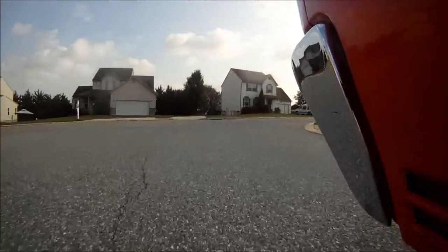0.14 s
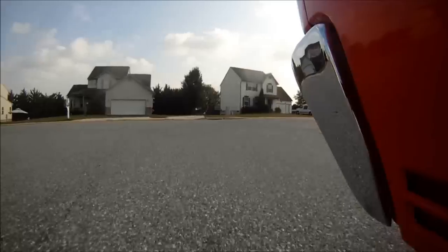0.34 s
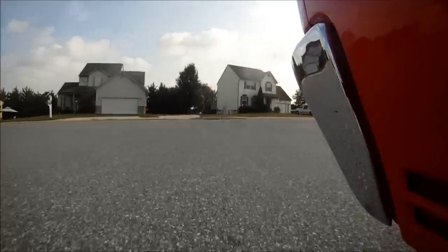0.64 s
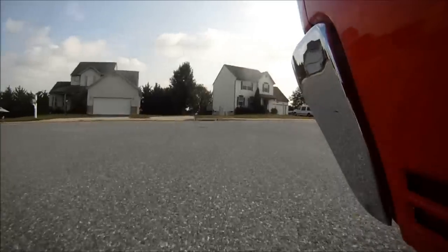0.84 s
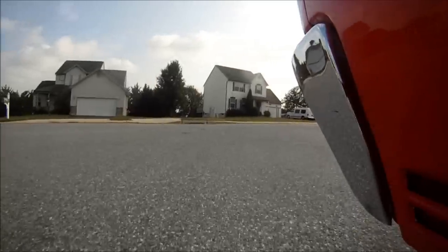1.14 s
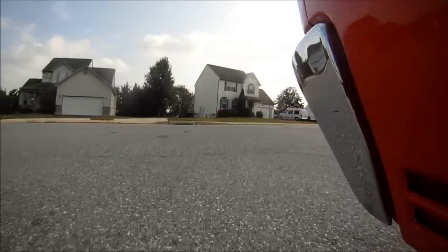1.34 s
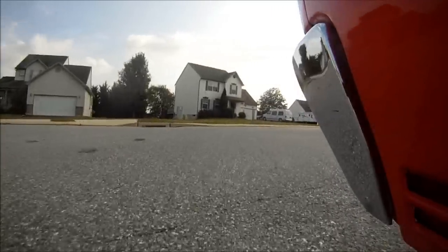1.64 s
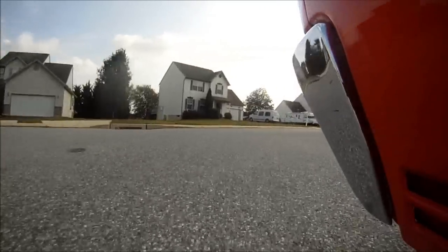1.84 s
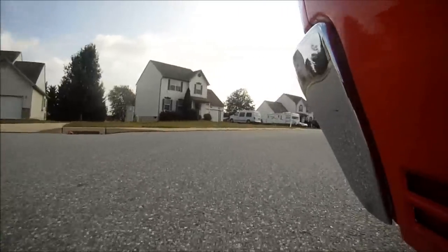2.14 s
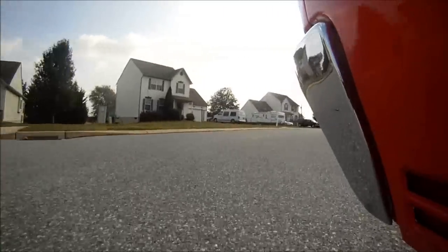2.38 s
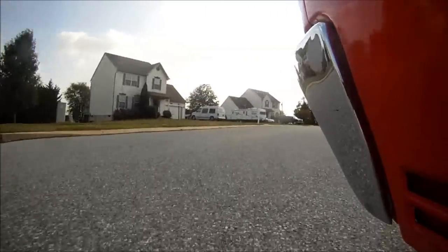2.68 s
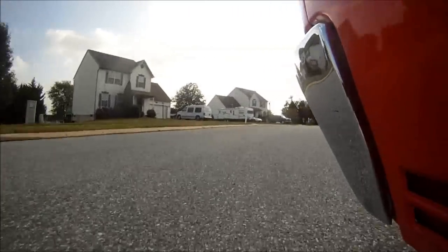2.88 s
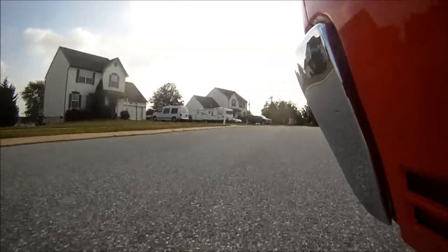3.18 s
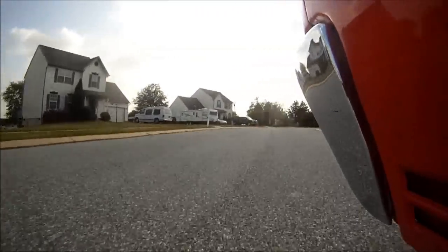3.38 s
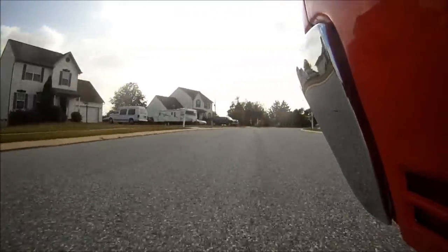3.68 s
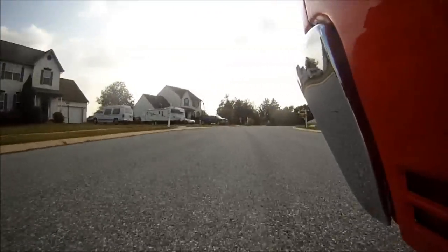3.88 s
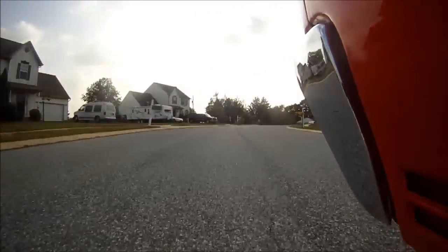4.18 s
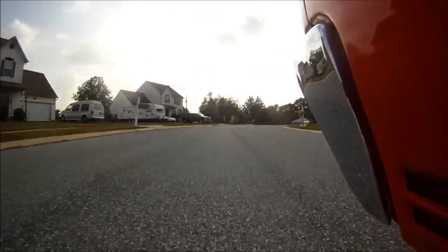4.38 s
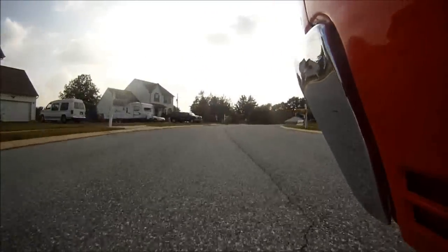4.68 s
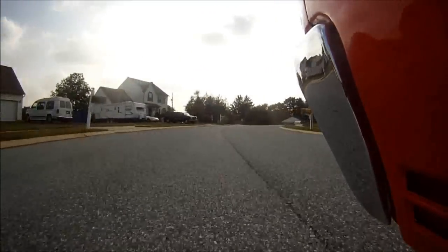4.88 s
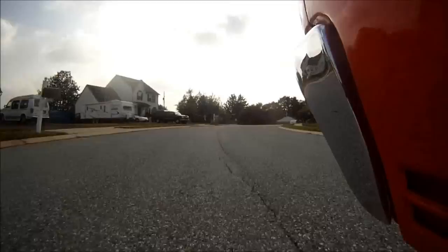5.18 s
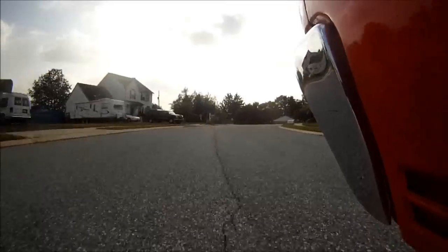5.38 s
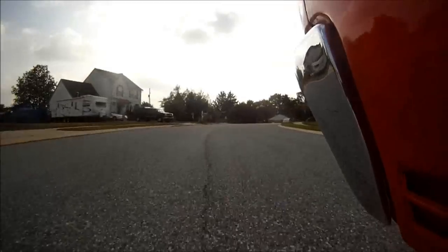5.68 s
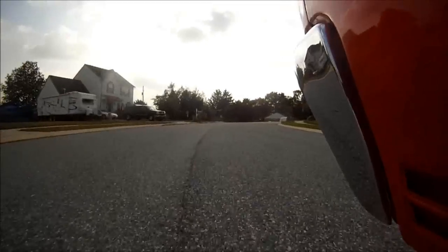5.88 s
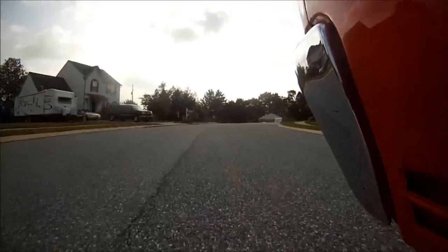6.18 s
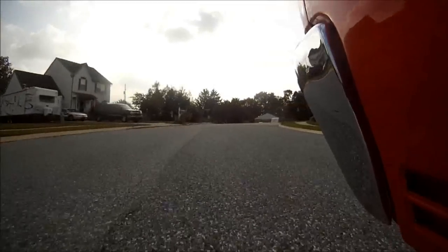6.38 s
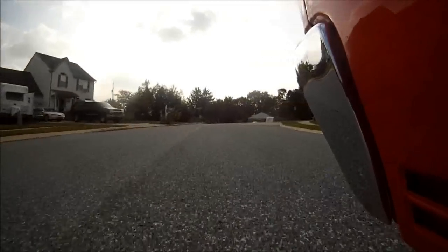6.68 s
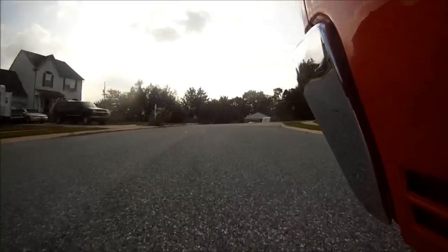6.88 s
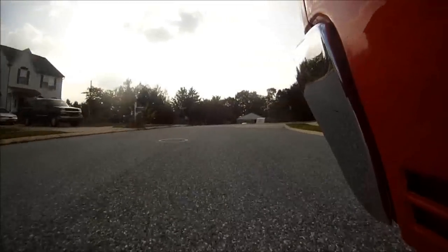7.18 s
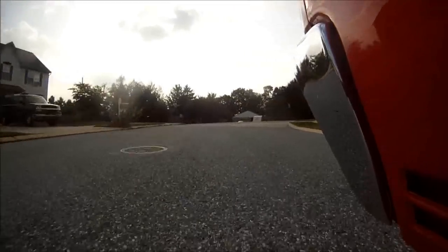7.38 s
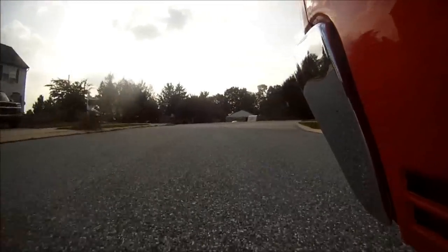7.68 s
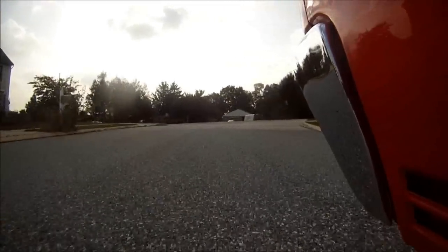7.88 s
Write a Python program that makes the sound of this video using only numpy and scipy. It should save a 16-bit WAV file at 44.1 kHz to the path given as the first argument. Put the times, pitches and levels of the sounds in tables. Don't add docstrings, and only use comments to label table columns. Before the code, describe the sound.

Close exhaust burble of a big V8, uneven and bassy, quickens into a throaty rasping drone with turbo whistle, then drops to hissing overrun.

```python
import sys
import numpy as np
from scipy import signal
from scipy.fft import rfft, irfft, next_fast_len
from scipy.io import wavfile
from scipy.ndimage import uniform_filter1d, map_coordinates

SR = 44100
rng = np.random.default_rng(int(sys.argv[2]) if len(sys.argv) > 2 else 0)


def wav_out(sig):
    wavfile.write(sys.argv[1], SR, np.round(np.clip(np.atleast_2d(sig).T, -1, 1) * 32767).astype(np.int16))


def voltage_ratio(decibels):
    exponent = np.asarray(decibels, float) / 20
    return 10 ** exponent


N = 354123

# start_s, four_stroke_cycles_hz
ENGINE_SPEED = [(0.0, 6.083), (0.39, 5.361), (0.79, 5.808), (1.53, 7.517), (2.3, 6.31), (2.43, 7.001),
                (2.72, 10.196), (2.97, 10.729), (3.28, 9.32), (3.5, 10.163), (3.6, 10.038), (4.24, 11.776),
                (5.41, 16.131), (5.98, 17.312), (6.93, 18.167), (7.19, 16.958), (7.32, 17.383),
                (8.04, 15.681)]
CRANK_START = -.143
FIRING_SLOTS = [0, 2, 3, 5]
IDLE_STRENGTH = [(-10.5, -17.5, -11.5, -14.5), (-7, -14.5, -10, -7.5), (-6, -12.5, -14, -4.4),
                 (-2, -40, -9.5, -8), (-4.5, -12, -7, -6), (-2.5, -14, -8.5, -5.5), (-4.5, -17, -8, -6.5),
                 (-7.5, -13.5, -10, -3.5), (-11, -14, -9, -3.5), (-6, -25, -15, -4.5),
                 (-9.5, -17, -7.5, -4), (-5.5, -20, -13, -4.5), (-13.5, -18, -7.5, -4.5),
                 (-10.5, -17.5, -8.5, -4), (-10.5, -8.5, -9, -5.5), (-11.5, -14.5, -7, -3.5),
                 (-7, -13, -9, -7), (-7, -16, -12, -8.5)]
IDLE_USUAL = [-3.5, -13, -6.5, -7]
LOAD_STRENGTH = [
    (-5, -2, -3, -1.7),
    (-2.5, -3, -1, -1.5),
    (-4, -0.5, -3.5, -.4),
    (-8, -3.5, -8, -0.66),
]
SHUT_S = 7.04
# start_s, blend_s
STAGES = [
    (2.55, 0.21),
    (3.65, 0.25),
    (5.75, 0.46),
    (7.04, .05),
]
# start_s, sound_speed_ratio, effort_db
GAS = [(0, 1.076, 6.5), (.6, .85, 0), (1.5, 1.01, -.5), (2.4, 1.034, -1.5), (2.7, 0.97, 1.5),
       (3.5, 0.96, .5), (4.1, .97, -1.5), (4.9, 1.13, -1.2), (5.6, 1.093, -3.5), (6.2, 1.07, 0.9),
       (7.0, 1.097, .1), (7.1, .98, -0.9), (8, 0.91, 1.6)]
# idle_db, moving_off_db, pull_db, cruise_db, shut_db
STAGE_DB = dict(boom=(11, 3.5, 4.6, 7.6, 3.1), drone=(4.5, 10, 5.5, -5, 19.5),
            ring=(-6.5, 3.5, 3.5, 5.5, 4.5), rasp=(-26.5, -24, -25, -25, -27.5),
            bark=(-32.5, -25, -22, -22.5, -36.5), jet=(-42, -39, -33, -36, -33.5),
            hiss=(-59, -49, -47.5, -46, -34), rumble=(-27, -29, -31, -29, -27.5),
            bark_duct=(-66, -43, -37.5, -47, -55), mid_duct=(-50.5, -54, -51.5, -51, -47),
            high_duct=(-51, -44, -51, -52, -44.5), low_duct=(-41, -62.5, -40.5, -43, -46))
# db_per_effort_db, db_per_cycle_hz
FOLLOWS = dict(boom=(0.78, -0.17), drone=(0.1, -0.68), ring=(0.1, -0.53), rasp=(0.76, 0.02),
           bark=(0.84, 0.045), jet=(0.72, 0.13), hiss=(1.05, -0.045), rumble=(0.05, -0.73),
           mid_duct=(.1, 0.51), high_duct=(.1, .05), low_duct=(2, 0.15), bark_duct=(0.78, 0.056))
MIDDLE_SPEED_HZ = 11

# pitch_hz, t60_s, signed share of each of the four runners
BOOM_MODES = [(60, .12, [.1, .09, .07, .09])]
DRONE_MODES = [(127, .06, [.12, -.02, .12, .06])]
RING_MODES = [(204, .078, [.37, .08, .09, .48]), (235, .06, [.05, .13, .06, -.26])]
RASP_MODES = [(452.6, 0.065, [.5, .8, 1.1, 1.2]), (666, 0.074, [0.11, 0.4, 0.75, 0.95]),
              (850, 0.067, [0.067, 0.056, 0.42, 0.038])]
HEAT_POWER = [2.9, 2.3, 0.68, 0.43, 0.24]

RUNNER_DB = [0, -6, -3, 0]
# pitch_hz, level_db
JET_SPECTRUM = [(410, -15), (700, -5.5), (765, -7.5), (875, -7), (1080, -11), (1140, -10), (1250, -10.5),
                (1580, -12.5), (1770, -9), (2190, -9), (2530, -11.5), (2760, -9.5), (3640, -19.5),
                (4810, -16), (5900, -26), (7670, -19), (13000, -120)]
HISS_SPECTRUM = [(530, -49), (900, -2.5), (966, -52), (1090, -7.5), (1480, -10), (1550, -17), (1640, -0.5),
                 (1980, -11.5), (2120, -6), (2390, -11.5), (2880, -8.5), (3650, -15), (4140, -16.5),
                 (4850, -1.5), (5900, -26.5), (7670, -56), (13000, -120)]
RUMBLE_SPECTRUM = [(60, -40), (140, -9), (200, 0), (260, -9), (340, -22), (650, -20), (1200, -30),
                   (1600, -60)]
# cut_s, level_db over the idle jets
GUSTS = [(0.08, 11.5), (0.119, 10.5), (0.296, 11), (.478, 9), (.558, 1), (.83, 11), (0.997, 9),
         (1.155, 7.5), (1.296, 7), (1.436, 11), (1.57, 4), (1.71, 9.5), (1.85, 1), (1.993, 11),
         (2.142, 9.5), (2.299, 14), (2.447, 14)]
GUST_RISE_S, GUST_LULL, LULL_S, GUST_HISS = 0.022, 0.25, 0.017, 2.6
JET_STEADY = (2.69, 1.44, 1.16, 0.9, 0.92)
JET_LEAD_S = (.006, .002, .001, .002, .005)

# pitch_hz, width_hz
DUCT_MODES = [(1810, 61), (2823, 72), (598, 34), (676, 73)]
GULP_DB = [-8, -8, 4, 0]

# start_s, pitch_hz, level_db
TURBO = [(4.2, 1080, -47), (4.7, 1390, -41), (5.0, 1634, -37.5), (5.3, 1854, -34), (5.62, 1992, -45),
         (6.2, 1830, -41), (7.0, 1622, -50), (7.3, 1573, -41.5), (8.03, 1600, -41.5)]
INTAKE_HZ, INTAKE_STEP_HZ, INTAKE_DB = 1830, 218, 2
WHISTLE_WANDER_HZ = (32, 32, 30, 7, 4)
WHISTLE_STEADY = (.05, .05, .05, .5, .6)
# start_s, pitch_hz, wander_hz, level_db
VALVE = [
    (7.4, 1700, 3.46, -37.5),
    (7.5, 1768, 21.6, -43.5),
]
HELD_HZ = 12000


def unit(x):
    return x / np.sqrt(np.mean(x ** 2) + 1e-20)


def curves(rows, s=None):
    at, *columns = np.transpose(rows)
    s = np.arange(N) / SR if s is None else s
    return [np.interp(s, at, column) for column in columns]


def wobble(rate):
    knots = rng.standard_normal(int(N * rate / SR) + 4)
    return map_coordinates(knots, [np.arange(N) * rate / SR])


def coloured(x, spectrum):
    m = next_fast_len(N + 8192)
    hz, db = np.transpose(spectrum)
    bins = np.log(np.fft.rfftfreq(m, 1 / SR) + 1)
    gain = voltage_ratio(np.interp(bins, np.log(hz + 1), db))
    return unit(irfft(rfft(x, m) * gain, m)[:N])


def place(s, t, rows):
    at = np.round((s[:, None] + t) * SR).astype(int)
    inside = (at >= 0) & (at < N)
    return np.bincount(at[inside], rows[inside], N)


def staged(values, s):
    edges = [start + side * blend / 2 for start, blend in STAGES for side in (-1, 1)]
    return np.interp(s, edges, np.repeat(values, repeats=2)[1:-1])


def layer_db(name, s=None):
    s = np.arange(N) / SR if s is None else s
    per_effort, per_speed = FOLLOWS[name]
    effort_db = curves(GAS, s)[1]
    overspeed_hz = curves(ENGINE_SPEED, s)[0] - MIDDLE_SPEED_HZ
    return staged(STAGE_DB[name], s) + per_effort * effort_db + per_speed * overspeed_hz


def firings():
    turns = CRANK_START + np.cumsum(curves(ENGINE_SPEED)[0]) / SR
    firing_turns = np.arange(int(turns[-1]) + 1)[:, None] + np.array(FIRING_SLOTS) / 8
    s = np.interp(firing_turns, turns, np.arange(N) / SR)
    db = np.array([staged([load[0], *load], s[:, k]) for k, load in enumerate(np.transpose(LOAD_STRENGTH))]).T
    luck = rng.standard_normal(s.shape + (2,))
    db += np.where(s > SHUT_S, .6, .5) * luck[..., 0]
    db[:len(IDLE_STRENGTH)] = np.subtract(IDLE_STRENGTH, IDLE_USUAL)
    jitter_s = np.where(s > SHUT_S, .00015, .0001) * luck[..., 1]
    return s + jitter_s, db


def pipe(s, db):
    shut = s > SHUT_S
    s = s + np.where(shut, .005, .0012)
    sound_speed = curves(GAS, s)[0].reshape(-1, 1)
    names = ("boom", "drone", "ring", "rasp", "bark")
    groups = (BOOM_MODES, DRONE_MODES, RING_MODES, RASP_MODES[::2], RASP_MODES[1:2])
    t = np.arange(-400, 4400) / SR
    rows = 0
    for name, modes, heat in zip(names, groups, HEAT_POWER):
        level_db = layer_db(name, s).reshape(-1, 1)
        for hz, t60, share in modes:
            luck = rng.standard_normal((s.size, 2))
            decay_db = 60 * np.maximum(t, 0) / t60
            size = np.tile(share, len(s))[:, None] * voltage_ratio(level_db + 0.2 * luck[:, :1] - decay_db)
            pitch_hz = hz * sound_speed ** heat * (1 + .004 * luck[:, 1:])
            rows = rows - size * np.sin(2 * np.pi * pitch_hz * t)
    rise = np.exp(-(np.minimum(t, 0) / .0031) ** 2)
    strength = (voltage_ratio(db) * np.where(shut, -1, 1)).reshape(-1, 1)
    return place(s.ravel(), t, rows * rise * strength)


def puffs(s, db, lead, width):
    t = np.arange(-1300, 1300) / SR
    size = voltage_ratio(db + RUNNER_DB + 1.5 * rng.standard_normal(s.shape)).reshape(-1, 1)
    gate = place(s.ravel() - lead, t, size * np.exp(-(t / width) ** 2))
    power = np.abs(uniform_filter1d(gate ** 2, size=SR // 4))
    return gate / np.sqrt(power + 1e-9)


def gusts():
    s, db = np.transpose(GUSTS)
    t = np.arange(-6000, 8000) / SR
    shape = np.where(t < 0, np.exp(t / GUST_RISE_S), -GUST_LULL * np.exp(-t / LULL_S))
    return uniform_filter1d(place(s, t, db[:, None] * shape), size=300)


def jets(s, db):
    t = np.arange(N) / SR
    gust_db = gusts()
    gate = puffs(s, db, staged(JET_LEAD_S, s.ravel()), 0.0059)
    shut = np.clip((t - SHUT_S + .01) / .12, 0, 1)
    jet = coloured((staged(JET_STEADY, t) + gate) * rng.standard_normal(N), JET_SPECTRUM)
    jet = jet * voltage_ratio(layer_db("jet") + gust_db) * (1 - shut)
    hiss = coloured((1.8 + gate) * voltage_ratio(2.0 * wobble(40)) * rng.standard_normal(N), HISS_SPECTRUM)
    hiss = hiss * voltage_ratio(layer_db("hiss") + GUST_HISS * gust_db)
    rumble = coloured((2.5 + gate) * rng.standard_normal(N), RUMBLE_SPECTRUM)
    return jet + hiss + rumble * voltage_ratio(layer_db("rumble"))


def ducts(s, db):
    gate = 0.63 + puffs(s, db + GULP_DB, -0.0064, 0.016)
    total = 0
    for name, (hz, wide) in zip(("mid_duct", "high_duct", "low_duct", "bark_duct"), DUCT_MODES):
        peak = [(hz - 4 * wide, -60), (hz - wide, -12), (hz, 0), (hz + wide, -12), (hz + 4 * wide, -60)]
        total = total + voltage_ratio(layer_db(name)) * coloured(gate * rng.standard_normal(N), peak)
    return total


def turbo(s, db):
    t = np.arange(N) / SR
    hz, level_db = curves(TURBO)
    lumps = voltage_ratio(3 * wobble(35)) * (staged(WHISTLE_STEADY, t) + puffs(s, db, .002, .008)) / 1.3
    intake_db = INTAKE_DB * np.cos(2 * np.pi * (hz - INTAKE_HZ) / INTAKE_STEP_HZ)
    onset = np.clip((t - 4.2) / 0.096, 0, 1)
    wandering_hz = hz + staged(WHISTLE_WANDER_HZ, t) * wobble(45)
    tone = np.sin(2 * np.pi * np.cumsum(wandering_hz) / SR)
    return voltage_ratio(level_db + intake_db) * lumps * onset * tone


def bypass_valve():
    t = np.arange(N) / SR
    total = 0
    for start, tone_hz, wander_hz, tone_db in VALVE:
        fade = np.clip((t - start) / 0.12, 0, 1) * voltage_ratio(tone_db + 3.4 * wobble(25))
        phase = 2 * np.pi * np.cumsum(tone_hz + wander_hz * wobble(60)) / SR
        total = total + fade * np.sin(phase)
    return total


def scene():
    s, db = firings()
    return (pipe(s, db) + jets(s, db) + ducts(s, db) + turbo(s, db) + bypass_valve())[None]


def low_pass(x):
    return signal.sosfilt(signal.butter(12, 16160, fs=SR, output="sos"), x)


def record(dry):
    capsule = signal.butter(2, 36, "high", fs=SR, output="sos")
    thin = signal.sosfiltfilt(capsule, dry)
    slow = signal.resample_poly(thin, HELD_HZ, SR, axis=1)
    held = signal.resample_poly(np.repeat(slow, 4, axis=1), SR, 4 * HELD_HZ, axis=1)
    held = np.pad(held, ((0, 0), (0, 8)))[:, :N]
    return low_pass(held)


dry = scene()
out = record(dry)
wav_out(out)
```